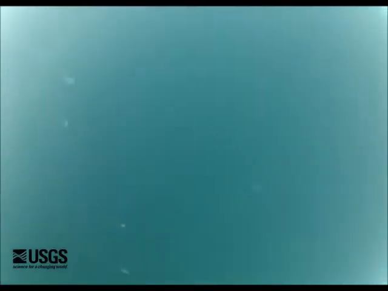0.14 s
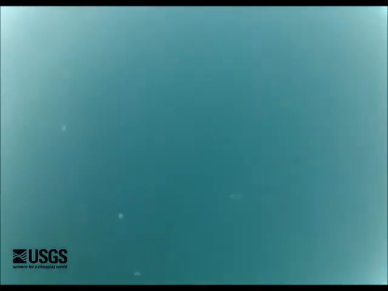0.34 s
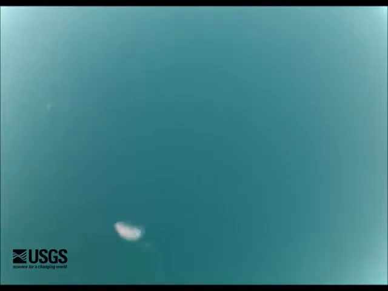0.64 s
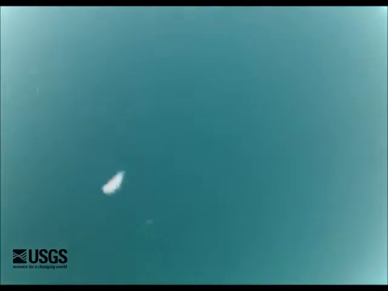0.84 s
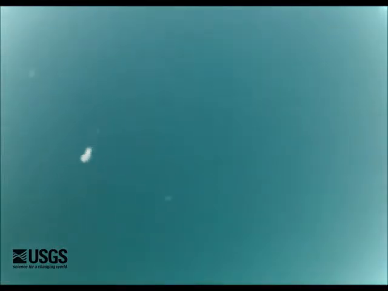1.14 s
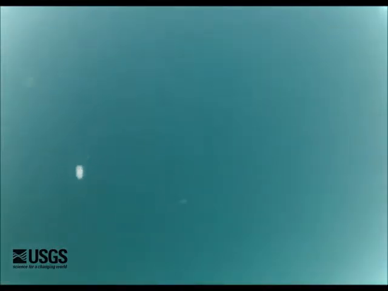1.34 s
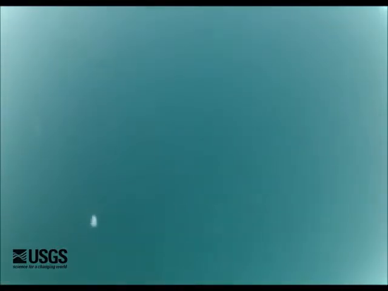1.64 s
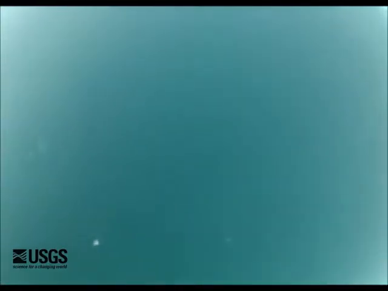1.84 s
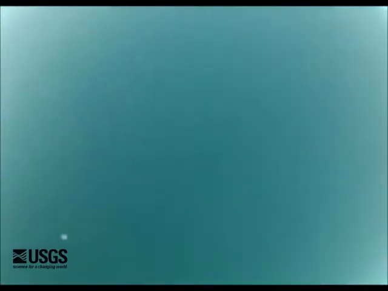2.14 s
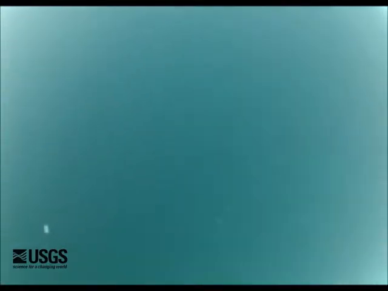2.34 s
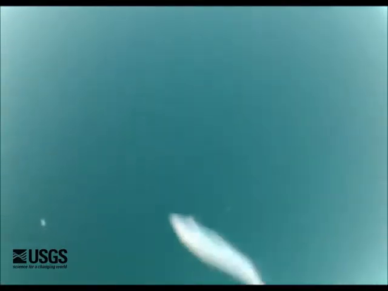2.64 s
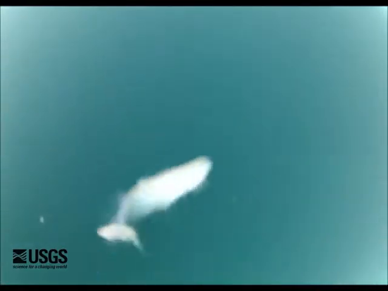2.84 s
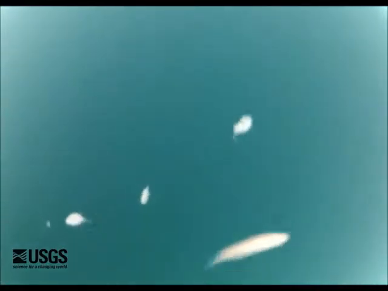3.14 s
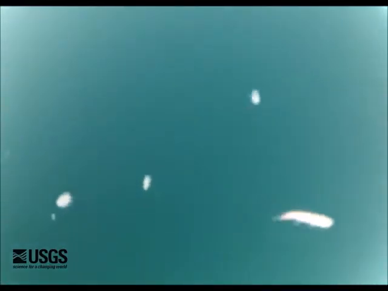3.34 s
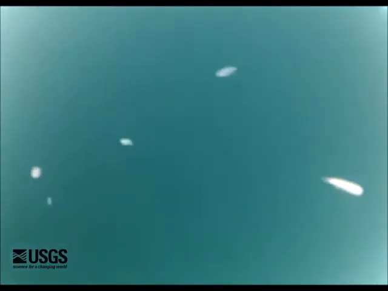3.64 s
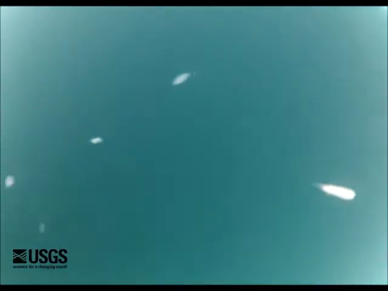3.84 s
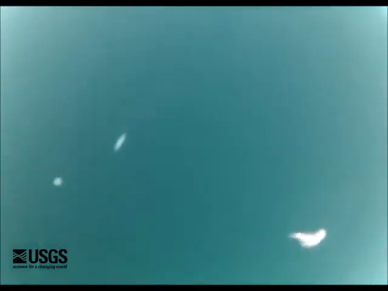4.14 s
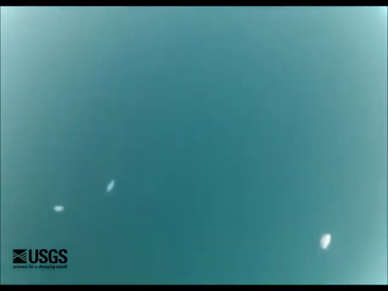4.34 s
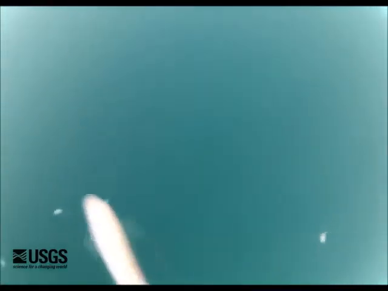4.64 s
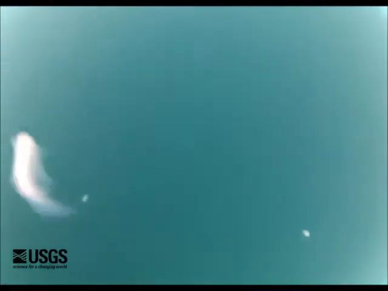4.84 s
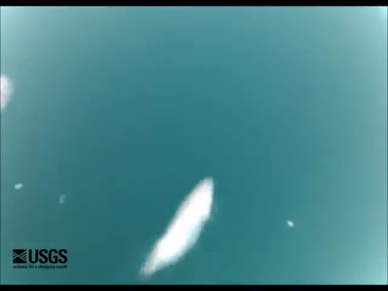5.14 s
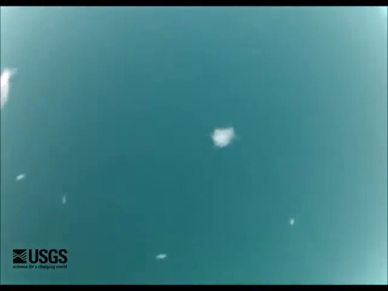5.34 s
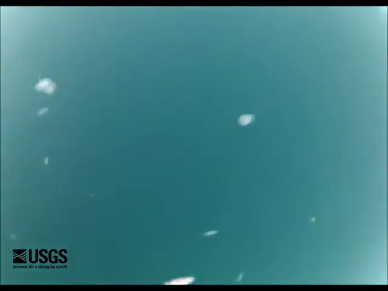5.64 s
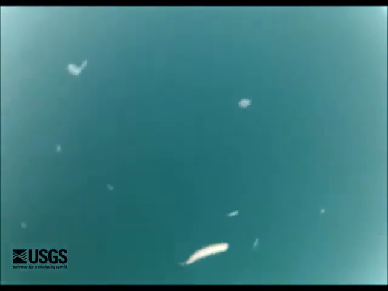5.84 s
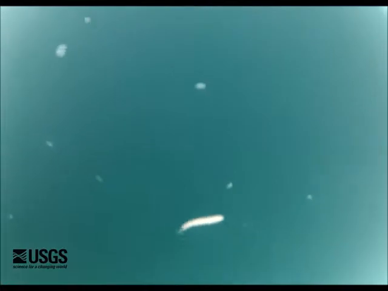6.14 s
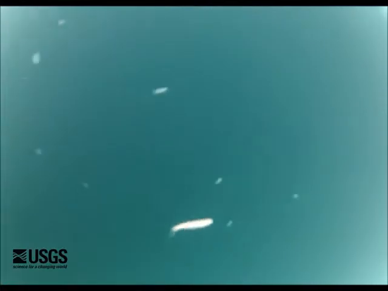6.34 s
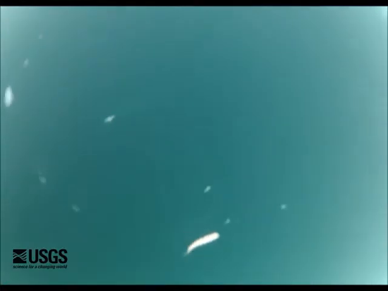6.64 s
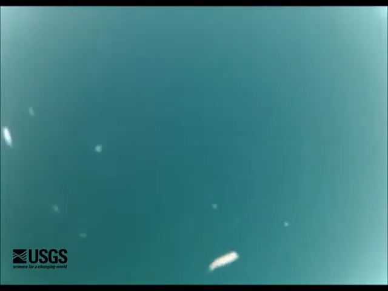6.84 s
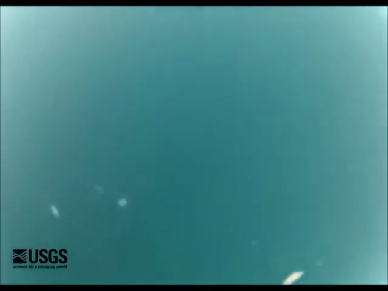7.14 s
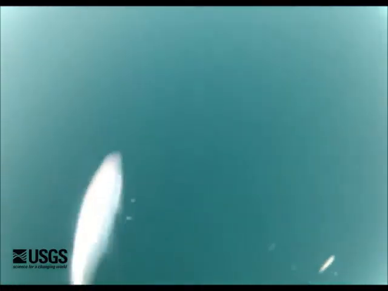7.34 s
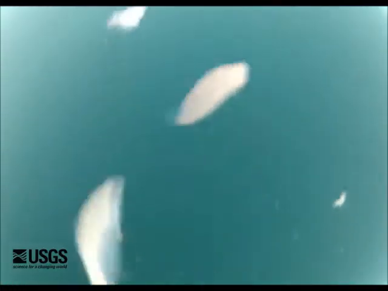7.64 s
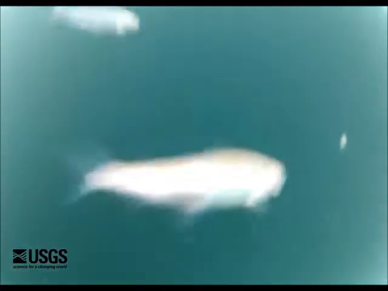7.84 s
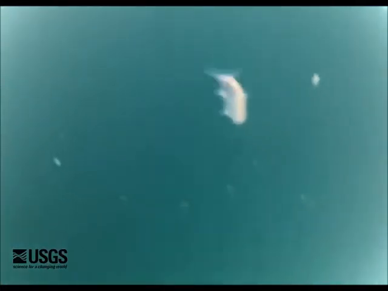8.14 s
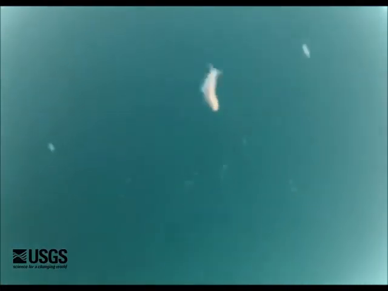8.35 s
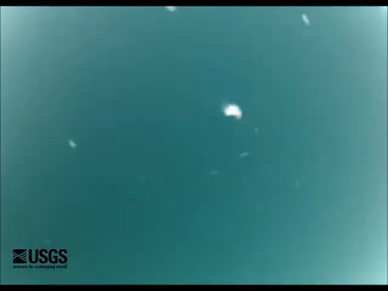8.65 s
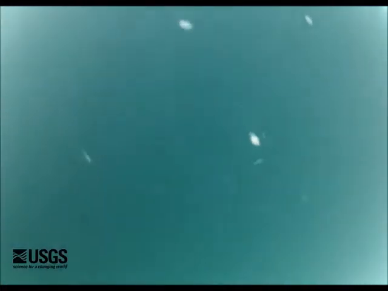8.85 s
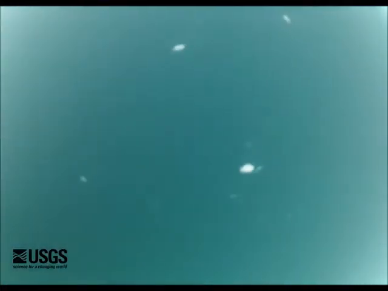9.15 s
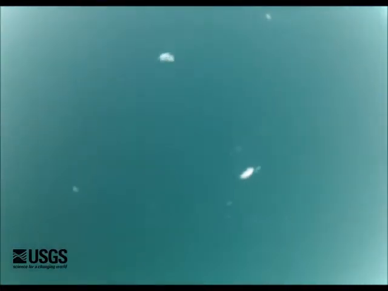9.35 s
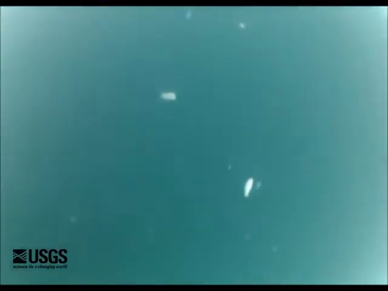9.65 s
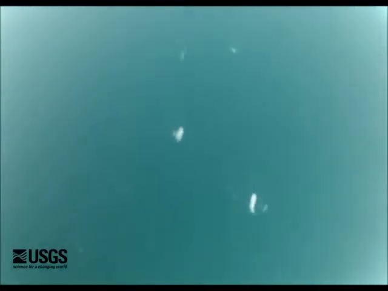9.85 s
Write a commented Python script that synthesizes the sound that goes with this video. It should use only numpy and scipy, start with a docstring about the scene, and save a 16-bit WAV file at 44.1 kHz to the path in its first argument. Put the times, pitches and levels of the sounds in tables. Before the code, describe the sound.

A boat engine runs at constant speed, heard close through the water: a dense buzzing hum with a rapid, soft throb, rumbling hull panels and light valve clatter. A thin fluttering whine breaks off and returns repeatedly. Near the end tiny ticks and four hollow bubble plops surface briefly. The sound is dull and enclosed, with only a faint grainy treble fizz and no splashing.

```python
"""A boat's diesel machinery runs at a steady speed, heard through a hydrophone hanging in the water.
From the start its engine tones drone over a churning hull rumble, a fine metallic clatter and humming pumps,
while a fluttering whine comes in spells. A faint tick falls at about 2.5 s and three more after 8.4 s;
then four bubbles, short ringing tones, gulp between 8.6 and 8.9 s.
Throughout, the recorder holds each coarse sample, which mirrors the sound into a thin treble fizz."""
import sys
import numpy as np
from scipy import signal
from scipy.fft import rfft, irfft, next_fast_len
from scipy.io import wavfile
from scipy.ndimage import map_coordinates

SR = 44100
rng = np.random.default_rng(int(sys.argv[2]) if len(sys.argv) > 2 else 0)


def file_out(sig):
    """Save sig as 16-bit WAV at sys.argv[1]."""
    # one column per channel
    cols = np.atleast_2d(sig).T
    # limit, then scale
    lim = np.clip(cols, -1, 1)
    pcm = np.round(lim * 32767).astype(np.int16)
    wavfile.write(sys.argv[1], SR, pcm)


N = 440559  # length in samples, about 10 s

CYCLE_HZ = 4.9996  # engine cycles per second
HOLD_HZ, TOP_HZ = 12000, 15280  # the recorder's coarse sample rate and its upper limit


def amp(db):
    """Turn decibels into a gain."""
    return 10 ** (np.asarray(db) / 20)


def unit(x):
    """Scale to an rms (average strength) of 1."""
    return x / np.sqrt(np.mean(x ** 2) + 1e-20)


def along(points, hz):
    """Read a curve of (Hz, value) points, joined by straight lines on a log frequency axis."""
    point_hz, values = np.transpose(points)
    return np.interp(np.log(hz + 1), np.log(point_hz + 1), values)


def wobble(rate):
    """A smooth random curve with this many random points a second."""
    knots = rng.standard_normal(int(N * rate / SR) + 4)
    return map_coordinates(knots, [np.arange(N) * rate / SR])


def filtered(x, response):
    """Multiply the spectrum of x by a response that depends on frequency."""
    size = next_fast_len(N + SR // 2)
    hz = np.fft.rfftfreq(size, 1 / SR)
    return irfft(rfft(x, size) * response(hz), size)[:N]


def tone(hz, wander):
    """A sine of rms 1 whose phase wanders by about this many radians."""
    turns = hz * np.arange(N) / SR + rng.random()
    return np.sqrt(2) * np.sin(2 * np.pi * turns + wander * wobble(3))


# Faint ticks in the water. Each row: start in seconds, level in dB before the filter.
TICK_TIMES = [(2.489, -53), (8.408, -47), (8.416, -49), (8.464, -51)]


def ticks(t60, centre_hz, width_hz):
    """Tiny bright snaps: noise that falls 60 dB in t60 seconds, kept near one treble frequency."""
    t = np.arange(SR // 10) / SR
    out = np.zeros(N + SR)
    for start_s, db in TICK_TIMES:
        snap = amp(db - 60 * t / t60) * rng.standard_normal(len(t))
        out[round(start_s * SR):][:len(t)] += snap
    return filtered(out[:N], lambda hz: np.exp(-((hz - centre_hz) / width_hz) ** 2))


# Bubbles. Each row: start in seconds, level in dB before a 3.5 dB cut, pitch in Hz,
# ring time in seconds (for a fall of 60 dB).
BUBBLE_RINGS = [(8.664, -15, 610, .03), (8.675, -10, 633, 0.044), (8.823, -8, 618, .045),
                (8.840, -10.5, 563, 0.068)]


def bubbles(swell_s):
    """Each bubble swells quickly into a short ring at its own pitch."""
    t = np.arange(SR // 5) / SR
    out = np.zeros(N + SR)
    for start_s, db, hz, t60 in BUBBLE_RINGS:
        shape = (1 - np.exp(-(t / swell_s) ** 2)) * amp(-60 * t / t60)
        ring = shape / shape.max() * np.sin(2 * np.pi * hz * t)
        out[round(start_s * SR):][:len(t)] += amp(db - 3.5) * ring
    return out[:N]


# Pumps and fans at speeds of their own. Each row: pitch in Hz, rms level in dB.
PUMP_TONES = [(59.3, -45.5), (103.8, -38), (143.9, -37.5), (167.4, -31), (1599.8, -53.5)]


def pumps():
    """Each pump or fan hums at a steady strength, with a slightly wandering phase."""
    return sum(amp(db) * tone(hz, wander=0.35) for hz, db in PUMP_TONES)


WHINE_ATTACK_S, WHINE_RELEASE_S = .05, .12


def spell(start_s, end_s):
    """One spell of whine, from 0 to 1: it rises, holds, and fades once the end time is reached."""
    t = np.arange(N) / SR
    attack = np.clip((t - start_s) / WHINE_ATTACK_S, 0, 1)
    release = np.clip(1 - (t - end_s) / WHINE_RELEASE_S, 0, 1)
    return attack * release


WHINE_REST_DB = -45  # what lingers between spells, before the flutter
# Spells of whine. Each row: start in seconds, end in seconds, rms level in dB before the flutter.
WHINE_SPELLS = [(0, 2.25, -36), (2.9, 3.6, -40.5), (3.65, 4.85, -37.3), (5.12, 6.5, -38), (6.25, 6.75, -34),
                (7.19, 7.75, -33), (8.05, 9.1, -40.5), (9.3, 9.99, -37.5)]


def whines(flutter_db, upper_db):
    """A fluttering whine catches and breaks off in spells; a higher one sounds all the time."""
    spells = sum(amp(db) * spell(start_s, end_s) for start_s, end_s, db in WHINE_SPELLS)
    strength = np.maximum(amp(WHINE_REST_DB), spells)
    lower = strength * amp(flutter_db * wobble(7)) * tone(hz=716.5, wander=.45)
    upper = amp(upper_db + 2.2 * wobble(4)) * tone(hz=840, wander=.4)
    return lower + upper


def crank(drift_s, start_s):
    """Engine cycles done so far; the governor lets the shaft run slightly early or late."""
    return CYCLE_HZ * (np.arange(N) / SR - start_s + drift_s * wobble(1.504))


def repeating(cycles, gains, scatter, size=16384):
    """A pattern, played once per cycle, with these gains on its orders (multiples of the cycle rate)."""
    # Little phase scatter keeps the pulses of the pattern sharp.
    phases = np.exp(1j * scatter * rng.standard_normal(len(gains)))
    pattern = irfft(gains * phases, size) * size / np.sqrt(2)
    return np.interp(cycles % 1 * size, np.arange(size), pattern, period=size)


# Throbbing in step with the firings. Each row: beats per cycle, depth in dB at full throb.
FIRING_THROB = [(3, 0.7), (6, 0.5), (8, 1.08), (12, 1.1)]


def machinery(cycles, spectrum, repeat_share, uneven_db, throb, size=1200):
    """Part of the shaking repeats every cycle, part is new each time; all of it throbs with the firings."""
    gains = amp(uneven_db * rng.standard_normal(size))
    drone_orders = np.round(np.transpose(ENGINE_ORDERS)[0]).astype(int)
    gains[drone_orders] = 0  # the drone plays these orders
    # Both parts get the same strength per Hz before they are mixed.
    same = unit(repeating(cycles, gains, np.pi)) * np.sqrt(size * CYCLE_HZ)
    fresh = rng.standard_normal(N) * np.sqrt(SR / 2)
    share = np.clip(repeat_share, 0, 1)
    mix = np.sqrt(share) * same + np.sqrt(1 - share) * fresh
    firing_db = sum(db * np.cos(2 * np.pi * round(beats) * cycles) for beats, db in FIRING_THROB)
    shaking = mix * amp(throb * firing_db)
    return filtered(shaking, lambda hz: amp(along(spectrum, hz)))


# Clatter of valves and gears. Each row: frequency in Hz, level in dB per Hz before a 1.7 dB lift.
CLATTER_SPECTRUM = [(1120, -86.5), (1250, -60.5), (1330, -65.5), (1410, -81), (1680, -75.5), (2020, -66),
                    (2280, -68.5), (2730, -77), (3150, -88.5), (3520, -80), (3950, -99), (4650, -96.5),
                    (5500, -110.7), (5900, -130.5)]


def clatter(cycles):
    """Fine metallic shaking of valves and gears, mostly new each cycle."""
    return amp(1.7) * machinery(cycles, CLATTER_SPECTRUM, repeat_share=0.33, uneven_db=6.0, throb=.45)


# Rumble of the hull. Each row: frequency in Hz, level in dB per Hz before a 0.5 dB cut.
HULL_SPECTRUM = [(18, -72.5), (50, -56), (90, -51), (140, -50), (215, -53), (365, -47.5), (425, -58),
                 (480, -52.5), (545, -58.5), (620, -50.5), (765, -62.5), (1000, -62.5), (1170, -74.5),
                 (1500, -140)]


def hull_rumble(cycles):
    """Low churning of the hull, about half of it the same each cycle."""
    return amp(-0.5) * machinery(cycles, HULL_SPECTRUM, repeat_share=0.51, uneven_db=3, throb=1.0)


# Ringing hull panels. Each row: pitch in Hz, distance in Hz at which the response halves,
# rms level in dB before the surges.
PANEL_BANDS = [(70, 2.5, -36.5), (138.7, 6.6, -36), (170, 2, -30.5), (712, 3.9, -44.5), (1600, 9.1, -55.5)]


def panels():
    """Each hull panel rings as a narrow, restless band of noise."""
    total = 0
    for centre, width, db in PANEL_BANDS:
        noise = rng.standard_normal(N)
        ring = filtered(noise, lambda hz: 1 / (1 + ((hz - centre) / width) ** 2))
        total = total + amp(db) * unit(ring)
    return total


# Surges of the low sound. Each row: period in seconds, time of a crest in seconds, depth in dB.
SURGE_RHYTHMS = [(1.32, 1.36, 0.63), (4.5, 2.0, .7)]


def swell():
    """The drone and panels rise and fall a little, in a quick and a slow rhythm."""
    t = np.arange(N) / SR
    return amp(sum(db * np.cos(2 * np.pi * (t - crest) / period) for period, crest, db in SURGE_RHYTHMS))


def balanced(gains, count=300, size=10):
    """A flywheel evens out the cycle: of many chance phasings, the one whose neighbouring orders beat least."""
    lines = gains * np.exp(2j * np.pi * rng.random((count, len(gains))))
    lurch = 0
    for gap in (1, 2, 3):  # orders this far apart beat together
        products = lines[:, gap:] * lines[:, :-gap].conj()
        beat = signal.lfilter(np.ones(size), 1, products)  # sums of neighbouring pairs
        lurch = lurch + np.sum(np.abs(beat) ** 2, axis=1)
    return lines[np.argmin(lurch)]


# Strong tones of the four-stroke engine. Each row: order (multiple of the cycle rate),
# rms level in dB before the knock, surges and final trim.
ENGINE_ORDERS = [(6, -42.5), (8, -50), (12, -52), (16, -34.5), (18, -40.5), (19, -37.5), (20, -32),
                 (21, -33.5), (23, -35), (24, -35.5), (25, -52), (27, -30.5), (28, -31.5), (29, -54),
                 (30, -37), (36, -28.5), (39, -46), (40, -37.5), (45, -45), (48, -34), (49, -38), (51, -43),
                 (57, -41), (60, -40.5), (66, -35.9), (69, -41), (72, -43), (75, -36.5), (78, -34.5),
                 (90, -41.5), (108, -53), (114, -44), (120, -38), (160, -50.5), (177, -50.5)]


def drone(cycles, waver_db, knock_db, count=3, order=57):
    """Every third upper order belongs to a knock that comes three times a cycle; the others make an even hum."""
    orders, levels = np.transpose(ENGINE_ORDERS)
    gains = np.bincount(np.round(orders).astype(int), amp(levels))
    k = np.arange(len(gains))
    in_knock = (k % count == 0) & (k >= order)
    knock = repeating(cycles, gains * in_knock, scatter=.45)
    hum = repeating(cycles, balanced(gains * ~in_knock, count=40), 0)
    return knock * amp(knock_db + waver_db * wobble(2.69)) + hum


def scene():
    """Everything that reaches the hydrophone."""
    cycles = crank(drift_s=.00005, start_s=.01)
    water = ticks(t60=.05, centre_hz=4720, width_hz=1100) + bubbles(swell_s=0.004)
    auxiliaries = pumps() + whines(flutter_db=1.5, upper_db=-43.5)
    shaking = clatter(cycles) + hull_rumble(cycles)
    low = panels() + amp(-0.14) * drone(cycles, waver_db=1.7, knock_db=0.4)
    return (water + auxiliaries + shaking + swell() * low)[None]


def record(dry, count=16):
    """Each coarse sample is held until the next: the steps mirror the sound around the sampling rate."""
    seconds = -(-N // SR)  # rounded up
    padded = np.pad(dry[0], (0, -N % SR), "reflect")
    coarse = signal.resample(padded, seconds * HOLD_HZ)
    held = np.repeat(coarse, count)
    steps = signal.resample(held, seconds * SR)[:N]
    return filtered(steps, lambda hz: hz < TOP_HZ)[None]


dry = scene()
out = record(dry)
file_out(out)
```